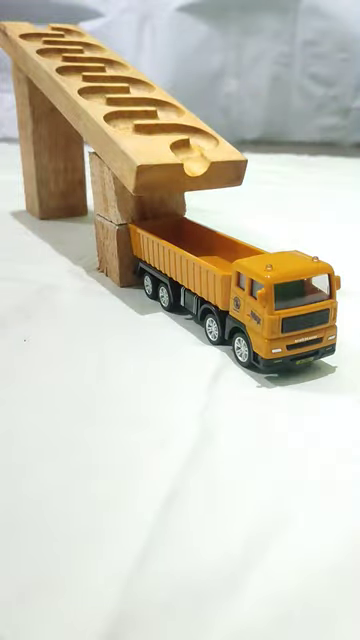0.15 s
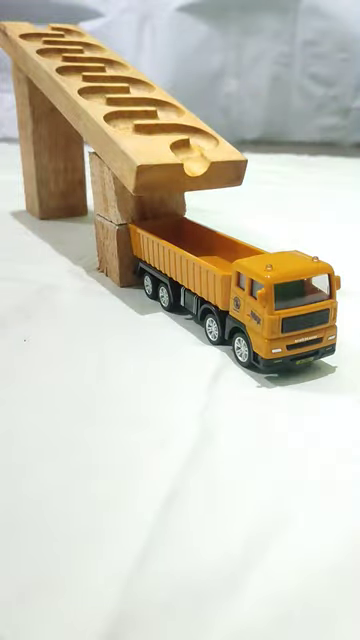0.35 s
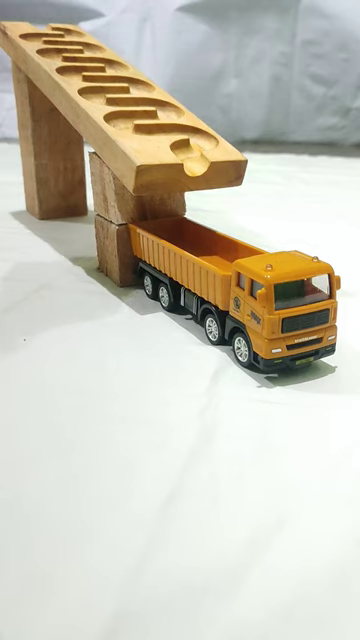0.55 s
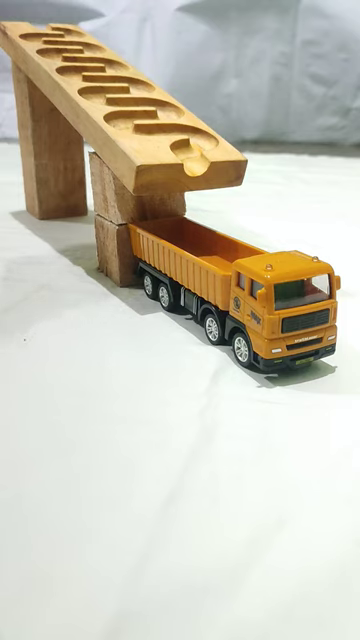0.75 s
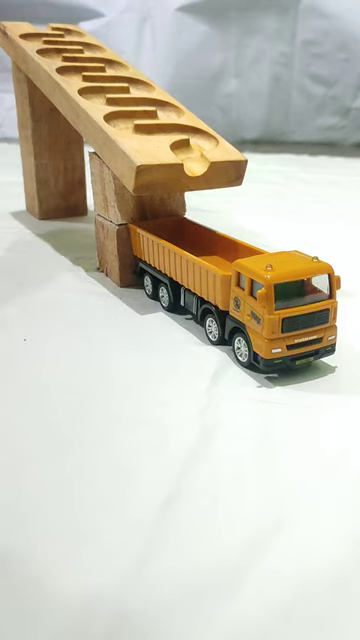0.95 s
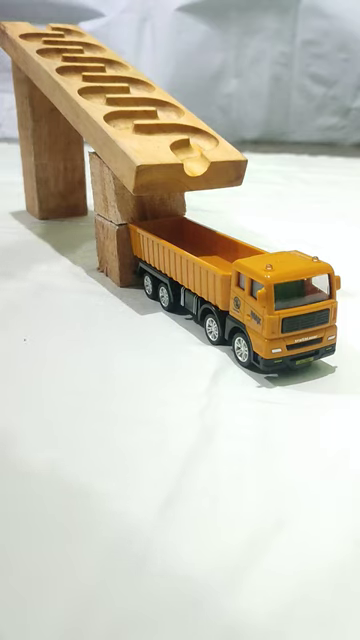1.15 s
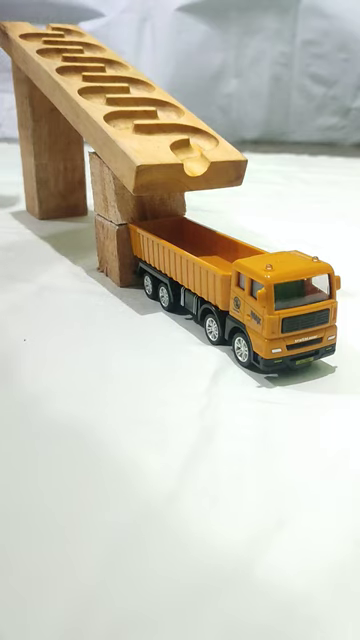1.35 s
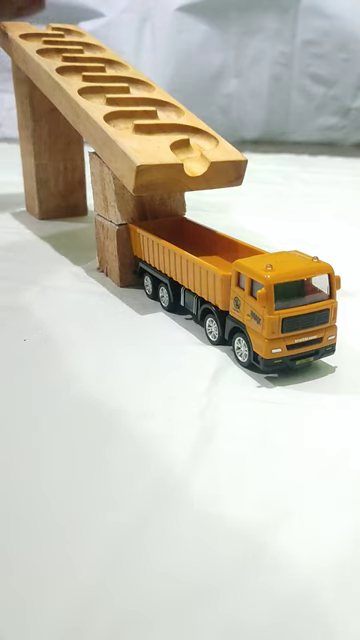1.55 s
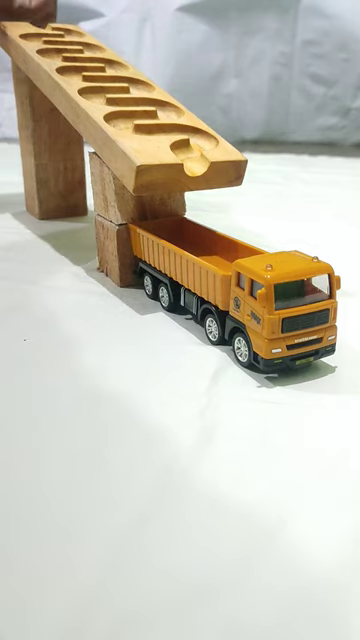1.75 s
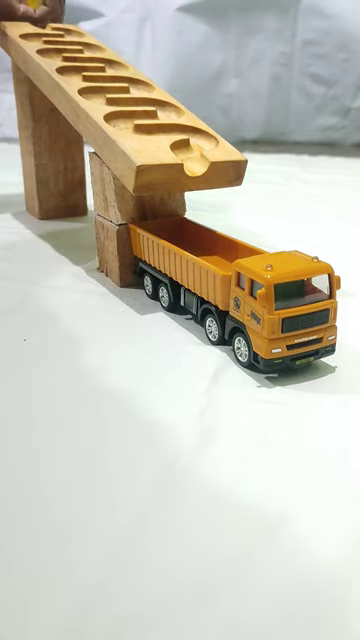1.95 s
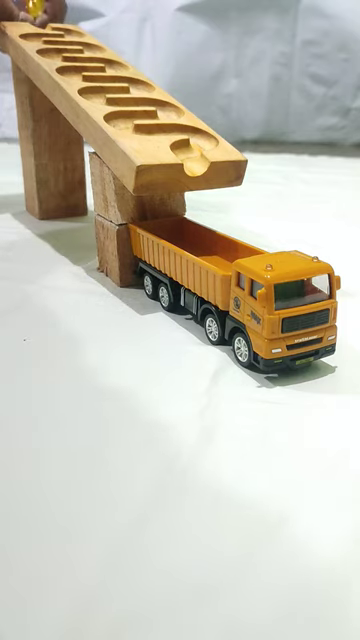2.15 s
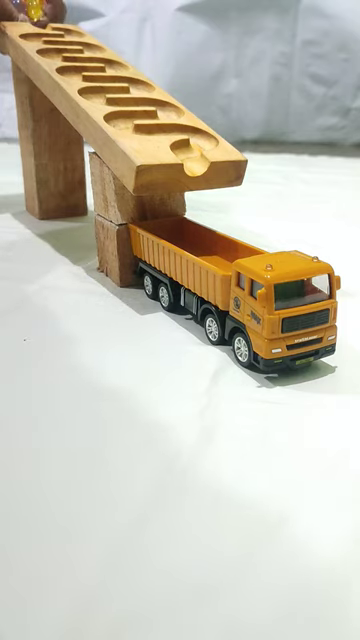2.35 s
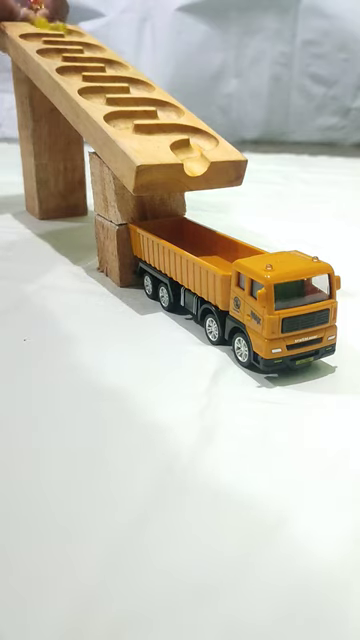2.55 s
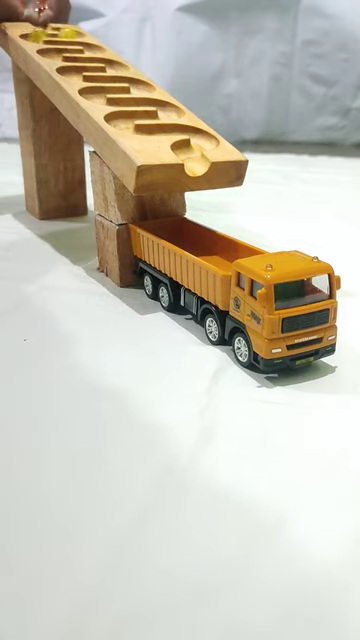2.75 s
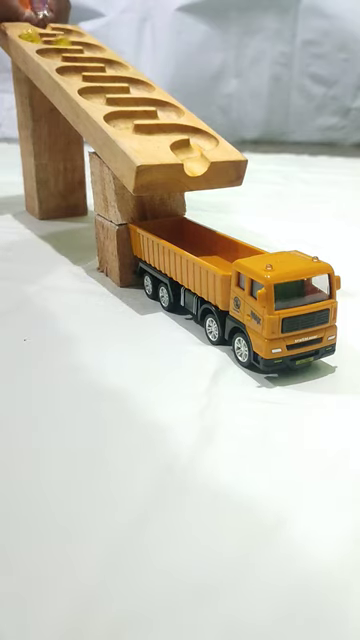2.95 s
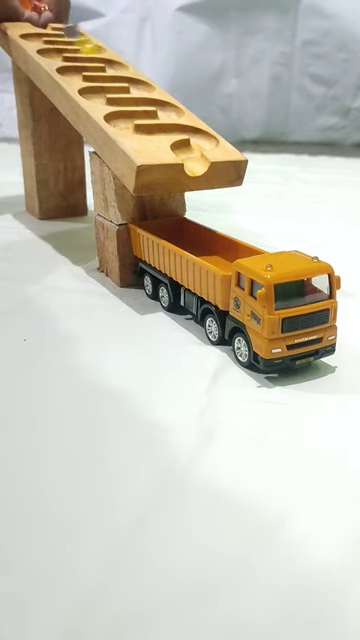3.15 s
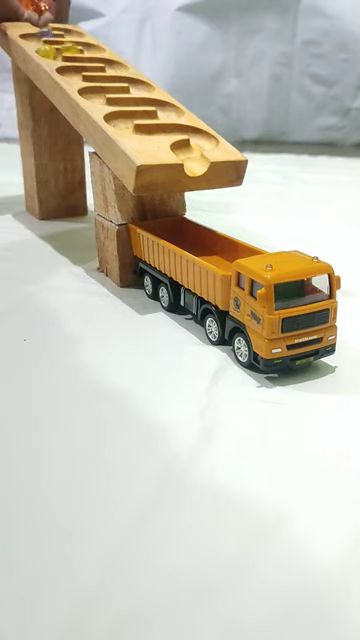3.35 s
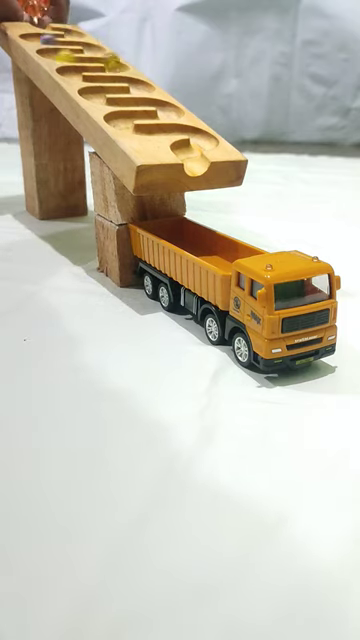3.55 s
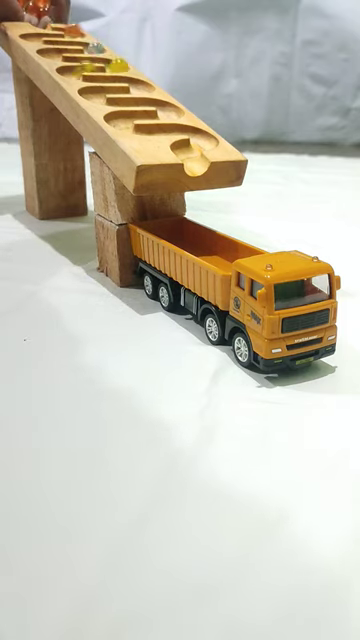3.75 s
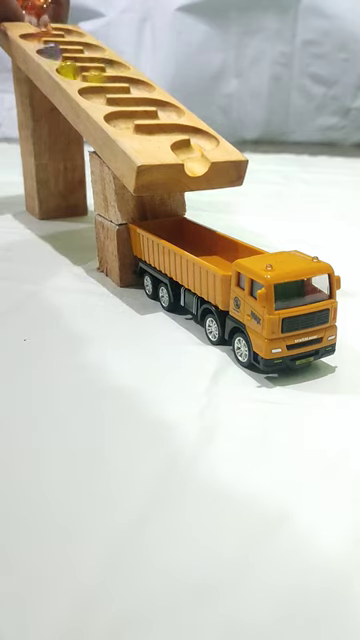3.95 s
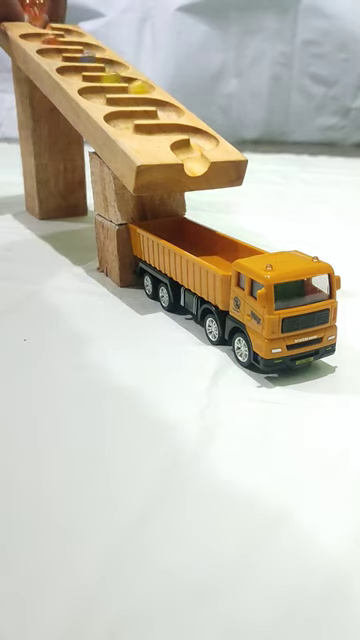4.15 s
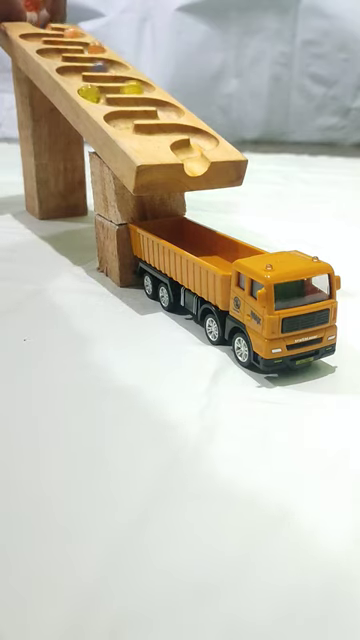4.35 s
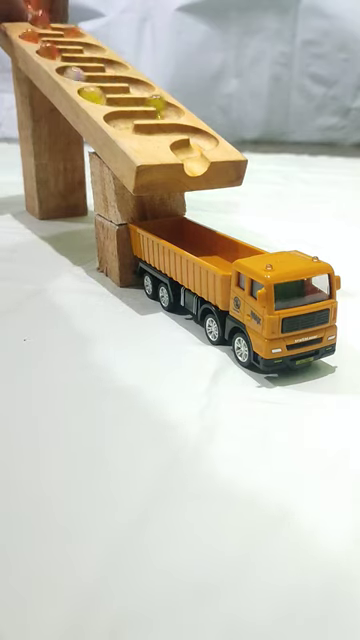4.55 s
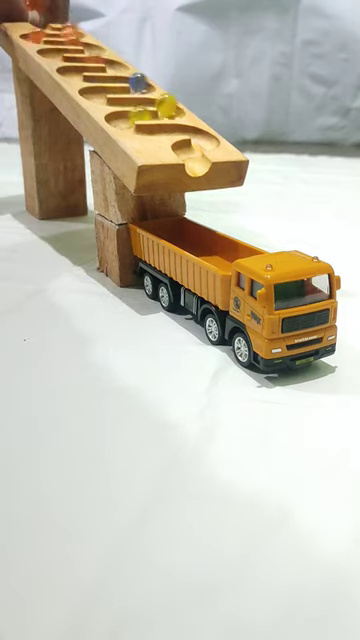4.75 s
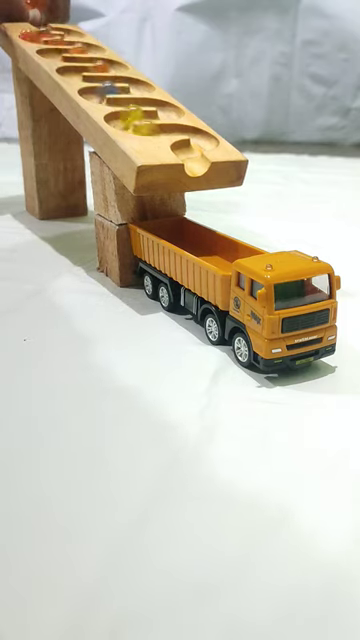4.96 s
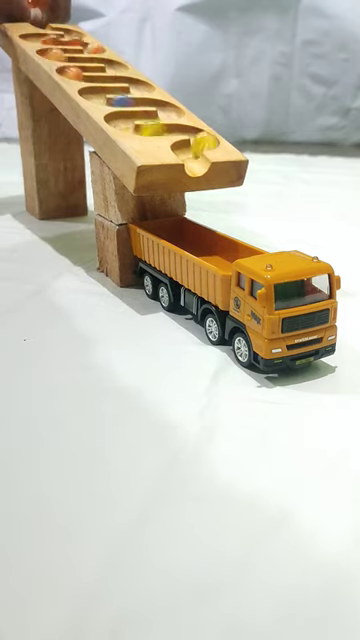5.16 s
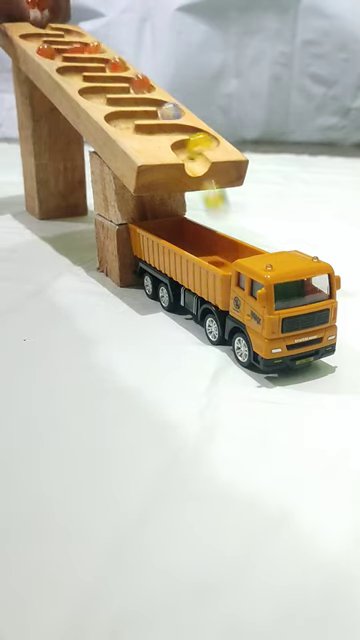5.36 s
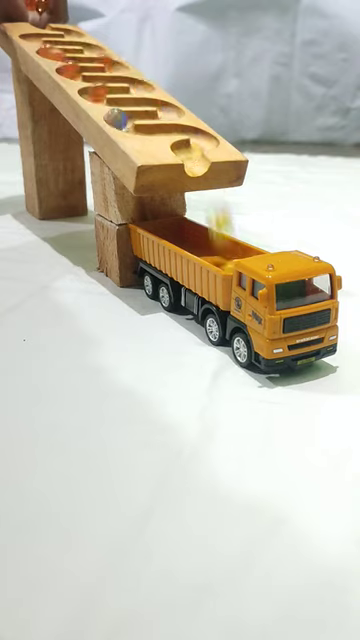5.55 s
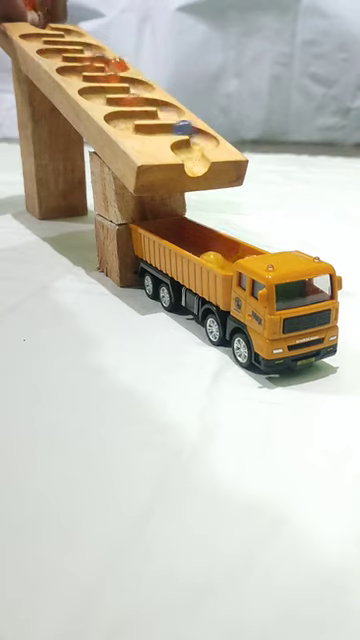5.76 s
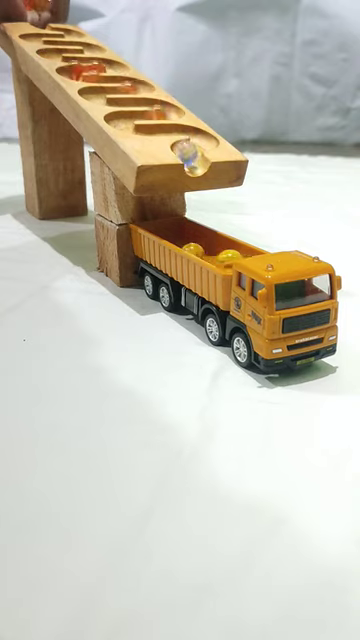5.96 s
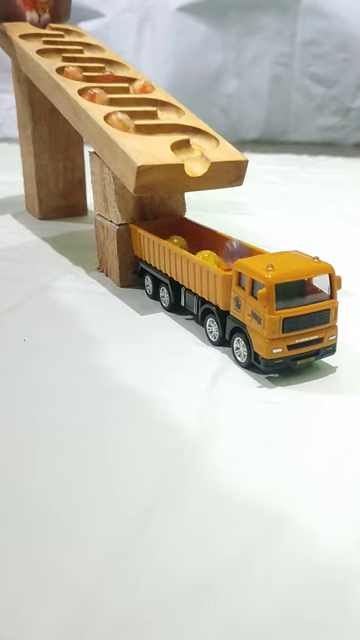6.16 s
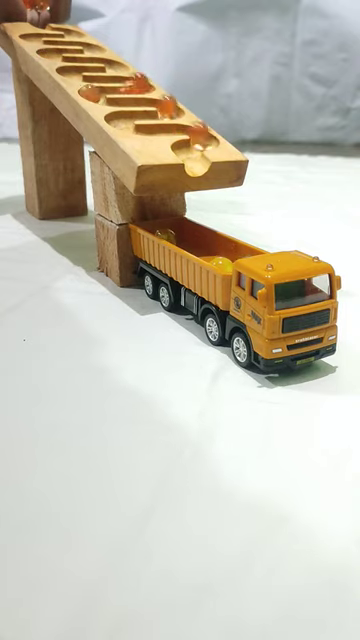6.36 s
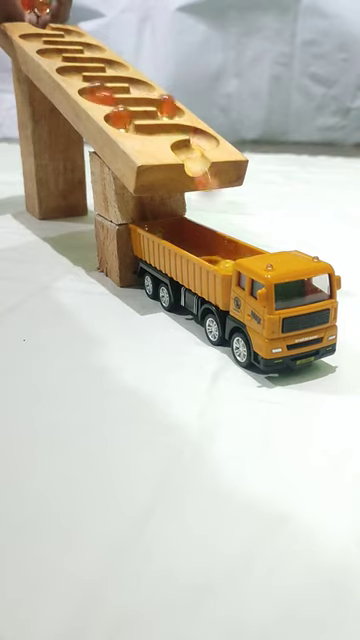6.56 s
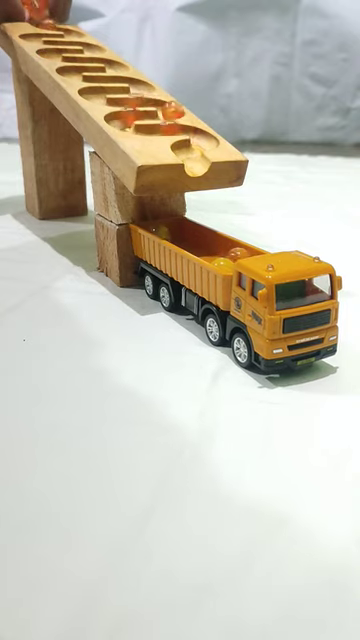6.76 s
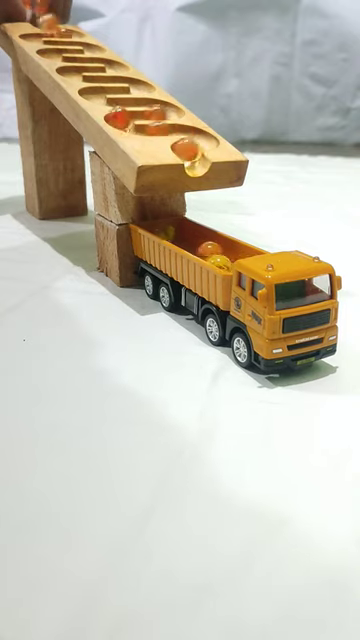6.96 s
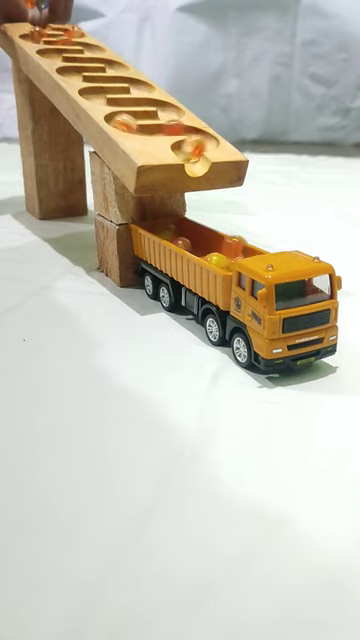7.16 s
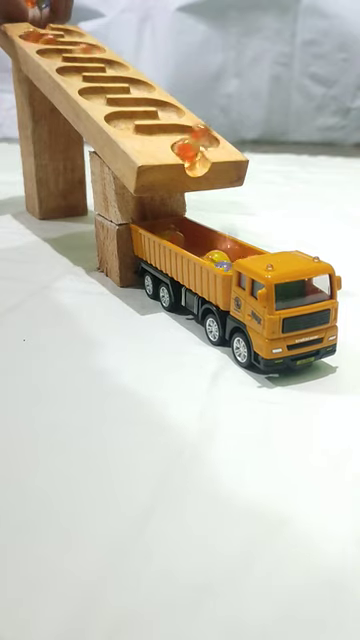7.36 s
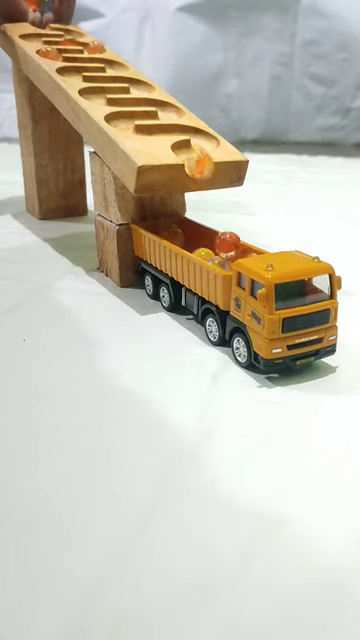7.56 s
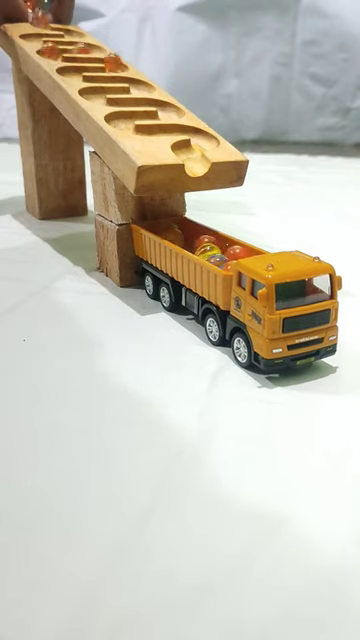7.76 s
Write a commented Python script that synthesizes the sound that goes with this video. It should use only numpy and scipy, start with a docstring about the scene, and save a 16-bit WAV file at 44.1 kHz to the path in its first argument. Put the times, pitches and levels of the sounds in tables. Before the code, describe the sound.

In a quiet hard-walled room, marbles clatter down a zigzag wooden track, then drop one by one with sharp, bouncing plastic cracks.

```python
"""A hand rustles faintly and taps as it gathers glass marbles; then they rumble down a zigzag groove in a wooden slope.
They knock at each bend and clink together; one by one they drop into a plastic truck bed, crack, bounce and rattle.
Struck bodies are sums of decaying modes, hard contacts are short noise bursts, and rolling is a train of tiny blows.
Echoes and a diffuse tail form a hard-walled room, heard by two microphone ports over a faint rumble and hiss."""
import sys
import numpy as np
from scipy import signal
from scipy.fft import rfft, irfft
from scipy.io import wavfile
from scipy.ndimage import uniform_filter1d

SR = 44100
rng = np.random.default_rng(int(sys.argv[2]) if len(sys.argv) > 2 else 0)


def persist_wave(psi):
    """Save psi, clipped to +-1, as 16-bit WAV."""
    counts = np.round(np.clip(psi, -1, 1) * 32767).astype(np.int16)
    wavfile.write(sys.argv[1], SR, np.atleast_2d(counts).T)


N = 344862  # samples

# In all event tables the levels are relative: each source adds its own offset.
# marble against the end of a bend: start_s, level_db, extra_treble_db
KNOCKS = [(2.5418, -31.5, -4), (2.5616, -35, 5), (2.5733, -24.5, -3.5), (2.6557, -21.5, -1),
          (2.6836, -27.5, 17), (2.7354, -28.5, -12), (3.0544, -44.5, -19), (3.1399, -36.5, -1),
          (3.1576, -19.5, 1.5), (3.2414, -31.5, -4), (3.2664, -30.5, 11.5), (3.4564, -37, -13),
          (3.5787, -37, -20), (3.631, -33, -15), (3.6975, -33, -5), (3.7227, -23, 2), (3.8382, -27, 2),
          (3.8864, -32.5, 15.5), (4.1224, -38, -12), (4.2718, -18, -3.5), (4.3739, -29, -5),
          (4.4166, -31, 12), (4.556, -28.5, -14), (4.5814, -30.5, -4), (4.6035, -28.5, 9.5),
          (4.6448, -28, 3), (4.6659, -24.5, 1), (4.6801, -23, -4.5), (4.7257, -28, 1), (4.7691, -26, 0.5),
          (4.8396, -26, -3), (4.9035, -28.5, 9.5), (4.9724, -31.5, 5.5), (5.1391, -36.5, 7.5),
          (5.2963, -54, -16), (5.3506, -33.5, 12), (5.412, -30.5, 7), (5.9163, -36, -7),
          (5.9647, -32.5, 0.5), (6.0402, -33.5, -13), (6.363, -35.5, 6), (6.4634, -32.5, 4.5),
          (6.493, -31, 16), (6.6093, -33, -0.5), (6.8487, -21, 1), (6.9188, -21.5, -4), (7.0075, -27, 9.5),
          (7.1167, -22.5, -1), (7.1385, -17.5, 0.5), (7.2227, -29.5, 10)]
# marble landing in the truck: start_s, level_db, extra_treble_db, thud_db, bounce_flight_times_s
DROPS = [(5.4861, -16, 0.5, -12.5, [0.073, .0541]), (5.6674, -16, 0, -12, [.077, .0475]),
         (6.1799, -24, 11, -19, []), (6.187, -15, 1.5, -7.5, [.0737]), (6.7374, -14.5, 4, -6, [0.075]),
         (7.2465, -14.5, 2, -9, [.0785]), (7.4846, -14.5, 2, -13, [0.076]), (7.644, -14, 2.5, -3, [0.084]),
         (7.7591, -16.5, 3, -26, []), (7.7871, -15.5, 1, -13, [])]
# glass touching glass: start_s, level_db
CLINKS = [(2.0734, -74), (2.1674, -72), (2.433, -49), (2.4946, -52), (2.6927, -51), (2.9092, -51),
          (4.317, -51.5), (4.3869, -51.5), (4.4495, -51), (4.467, -48.5), (4.4904, -46), (4.6573, -52.5),
          (6.0337, -63.5), (6.5228, -46), (6.6297, -52), (6.8063, -38), (7.007, -47.5)]
# loudness curve of rolling along the groove: time_s, level_db
ROLL_CURVE = [(2.53, -79), (2.57, -56), (2.92, -44), (2.99, -48.5), (3.22, -46.5), (3.52, -51), (3.78, -40),
              (4.04, -49), (4.18, -40.5), (4.52, -47), (4.72, -36.5), (5.08, -43), (5.2, -41.5),
              (5.95, -40), (6.15, -48.5), (6.38, -39.5), (7.2, -44.5), (7.82, -44.5)]
# soft taps of the hand: start_s, level_db, low_body_db
TAPS = [(0.391, -50.5, -2), (0.702, -63, -22), (1.554, -53, -9), (1.716, -48.5, -33), (1.813, -55, -27),
        (2.0731, -44.5, -19)]
# strokes of the hand: peak_s, level_db, swell_s, fade_s
STROKES = [(0.572, -54.5, 0.043, 0.027), (0.76, -69, .03, 0.029), (0.862, -63, .035, 0.067),
           (0.97, -59.5, 0.052, 0.084), (1.04, -66.5, 0.13, 0.52), (1.62, -65.5, 0.013, 0.06),
           (1.715, -67.5, 0.14, 0.23), (2.054, -66, .03, 0.054), (2.16, -61, 0.05, 0.056)]

# modes of the wooden slope: pitch_hz, level_db, t60_s
SLOPE_MODES = [(512.4, -29, 0.18), (552, -33.5, 0.057), (634, -26.5, 0.033), (1010, -38, 0.021),
               (1285, -8.5, 0.022), (1415, -3.5, 0.05), (1695, -14, 0.027), (2090, -17.5, 0.027),
               (2287, -6.5, 0.031), (2510, -8, 0.022), (2560, -4.5, 0.027), (2750, -15, 0.039),
               (3250, -16, 0.037), (3552, -18, 0.044), (3890, -15.5, 0.022), (4080, -31, 0.0048),
               (5100, -15.5, 0.009), (5750, -25.5, 0.0042), (7210, -28, 0.014)]
# modes of the plastic truck bed: pitch_hz, level_db, t60_s
BED_MODES = [(1170, -14.5, 0.017), (1235, -7, 0.029), (1371, -6, 0.051), (1638, -1.5, 0.037),
             (1830, -17, 0.0035), (2276, -6.5, 0.04), (2990, -0.5, 0.015), (3130, -13, 0.035),
             (3670, -2.5, 0.022), (3996, 2.5, 0.026), (4240, -7, 0.015), (6000, -20, 0.007),
             (6720, -10, 0.028), (7270, -4.5, 0.03)]

# spectrum of a landing: frequency_hz, density_db
CRACK_SPECTRUM = [(200, -27), (700, -22), (950, -14), (1250, -4), (3000, -0.5), (4000, 5.5), (5000, -2),
                  (6100, -0.5), (8000, -4.5), (9200, -8), (11500, -3), (14000, -7)]
# spectrum of a glass tick: frequency_hz, density_db
GLASS_SPECTRUM = [(700, -39), (2000, -23), (3700, -9), (5200, -6), (7200, 3.5), (9000, 1), (14000, -5)]
# spectrum of the rustle: frequency_hz, density_db
CLOTH_SPECTRUM = [(200, -11), (600, -5.5), (1000, -7.5), (1800, -3), (3500, -3), (5200, -6), (7000, -8),
                  (9000, -15), (14000, -12)]
# spectrum of the still room: frequency_hz, density_db
AIR_SPECTRUM = [(20, 6.5), (60, -2.5), (140, -10), (250, -15.5), (400, -19.5), (1000, -25), (4000, -29),
                (7000, -37), (9000, -37.5), (14000, -32)]
# the board's dense modes, heard as a noise burst: frequency_hz, density_db
DENSE_MODES = [(150, -23), (300, -12.0), (650, -3.5), (900, -9.5), (2000, 0.5), (3000, -5.5),
               (5500, -7.5), (7500, -18.0), (10000, -22.5)]
# colour of the soft rolling contact, which favours the low modes: frequency_hz, gain_db
SOFT_CONTACT = [(230, 8), (400, 7.5), (500, -2.0), (660, 10.5), (950, 5), (1400, 4), (2000, -0.5),
                (2600, -8.0), (4000, -16), (7000, 0.0), (12000, 8)]
# how well the narrow board radiates: frequency_hz, gain_db
BOARD_RADIATION = [(60, -27), (250, -9), (380, -11), (500, 1), (7000, -1), (9000, -5), (14000, -4)]
# how the bed radiates, weak near 500 Hz and strong near 1.1 kHz: frequency_hz, gain_db
BED_RADIATION = [(100, 1.5), (500, -6.5), (1100, 6.5), (2000, -0.5)]

# decay of the room: frequency_hz, t60_s
ROOM_T60 = [(200, 0.77), (600, 0.64), (1500, 0.4), (3000, 0.39), (7000, 0.29), (13000, 0.33)]
# strength of the room's tail after the slope: frequency_hz, gain_db
SLOPE_WET = [(500, -2), (1400, -5), (2500, 3.5), (3800, 5.5), (5200, 4.5), (7000, 4), (12000, 1)]
# strength of the room's tail after the truck: frequency_hz, gain_db
TRUCK_WET = [(500, -8), (1400, -1.5), (2800, 7), (4000, -2.5), (7000, 0.5), (12000, -4)]
# strength of the room's tail after the clinks, then after the hand: frequency_hz, gain_db
CLINK_WET = [(2000, 18.4), (7000, 5.0), (13000, 4.6)]
HAND_WET = [(500, -18.0), (8000, -15.0)]
# near reflections from table and wall: left_delay_s, right_delay_s, relative_level_db
ECHOES = [(.0011, .0016, -4), (.0027, .0021, -7), (.0056, .0063, -10), (0.0104, .0107, -12.5),
          (0.018, .0184, -10)]

# colour of the two microphone ports: frequency_hz, gain_db
PORT_COLOUR = [(5200, -0.5), (6200, 2), (6600, 4), (6850, 6.5), (7150, 4.5), (7500, 1.5), (8200, -0.5),
               (10000, -2.5), (14000, -2.5)]
# balance of sound from the slope: frequency_hz, left_minus_right_db
SLOPE_PAN = [(60, -2.5), (150, 0), (380, 1), (950, -2.5), (2380, 0), (5970, -5.5), (15000, -0.5)]
# balance of sound from the truck: frequency_hz, left_minus_right_db
TRUCK_PAN = [(60, -3), (120, -4.0), (240, 0), (480, -4.5), (950, -5), (1890, -2.5), (3770, -1.5),
             (7510, -5.5), (15000, -3)]

PORT_LAG_S = 0.0003635  # a blow reaches the right port later by this
TAIL_LAG_S = 0.00031  # span that sets how alike the room's diffuse tail is at the two ports: alike for long waves, less so for short
EDGE_HZ = 14250  # upper limit of the band
# light ticks between the bends: level over the rolling, and spread of level and treble
TICK_OVER_DB, TICK_SPREAD_DB, TICK_TREBLE_DB = 6, 4, 2.5
LANDING_BODY_DB = -1.5  # a full landing rings the bed more than a bounce
# a bounce is weaker, thinner and duller than its landing; each further one loses a little more
BOUNCE_DB, BOUNCE_BODY_DB, BOUNCE_TREBLE_DB, NEXT_BOUNCE_DB = -9.5, -4.5, -1.5, -1.5
STROKE_DEPTH_DB = 16.5  # rise over one swell time, fall over one fade time
# body near 1.4 kHz gains this much per dB below a firm knock, up to a limit; above firm it loses
FIRM_DB, BODY_PER_DB, BODY_MOST_DB = -28, 0.37, 11.5


def knocks(rows, level_db=-0.99, tick_db=-32, thock_db=-16):
    """Modal excitation: a marble's impact rings the board; lighter is rounder, harder contact is brighter."""
    out = np.zeros((2, N))
    for start_s, db, treble_db in rows:
        body_db = min(BODY_PER_DB * (FIRM_DB - db), BODY_MOST_DB)
        tilt = [(500, 1.06 * body_db), (1450, body_db), (2200, 0.005), (2800, 0),
                (3800, 0.75 * treble_db), (5500, treble_db), (9000, 0.7 * treble_db)]
        wood = blow(ring(SLOPE_MODES, spread_db=1.5, detune=0.0067, aim_db=1), 0)
        wood = wood + blow(burst(DENSE_MODES, seconds=0.0079), thock_db)
        glass = blow(burst(GLASS_SPECTRUM, seconds=0.0023), tick_db)
        add(out, start_s, blow(colour(wood + glass, tilt), db + level_db))
    return colour(out, BOARD_RADIATION)


def ticks(count=70):
    """Random light impacts: marbles brush the groove wall as hard as they roll; rows like the knocks."""
    when, strength, treble = rng.random((count, 3)).T
    first_s = ROLL_CURVE[0][0]
    start_s = first_s + when * (N / SR - first_s)
    rolling_db = np.interp(start_s, *np.transpose(ROLL_CURVE))
    db = rolling_db + TICK_OVER_DB + TICK_SPREAD_DB * (2 * strength - 1)
    return list(zip(start_s, db, TICK_TREBLE_DB * (2 * treble - 1)))


def rolling(level_db=-5.0, bumps_per_s=420, bump_db=3, lurch_db=4.5, count=7, size=700):
    """Random impulse excitation: wood grain jolts the marbles, in lurches at several places on the board."""
    out = np.zeros((2, N))
    for _ in range(count):
        bumps = (rng.random(N) < bumps_per_s / count / SR) * rng.choice([-1, 1], N)
        lurch = np.clip(unit(uniform_filter1d(rng.standard_normal(N), size)), -2, 1)
        bump_strength = np.minimum(rng.exponential(1, N), 2)
        bumps = bumps * amp(bump_db * bump_strength + lurch_db * lurch)
        board = ring(SLOPE_MODES, spread_db=5, detune=0.003, aim_db=1)
        out += signal.oaconvolve(bumps[None], board, axes=1)[:, :N]
    rumble = colour(colour(out, SOFT_CONTACT), BOARD_RADIATION)
    return unit(rumble) * follow(ROLL_CURVE) * amp(level_db)


def drops(level_db=.5, bed_db=-3, jostle_db=-25, jostle_s=.035, settle_db_per_s=70, count=3):
    """Impact on a thin shell: glass cracks on the heap, the plastic bed rings, and loose marbles settle."""
    out = np.zeros((2, N))
    for start_s, db, body_db, treble_db in landings():
        crack = blow(burst(CRACK_SPECTRUM, seconds=0.0011, rise=0.001), 0)
        bed = blow(ring(BED_MODES, spread_db=2.5, detune=0.013, aim_db=4.0), bed_db)
        tilt = [(1800, body_db), (2800, 0.0074), (4500, 0.0067), (6500, treble_db)]
        add(out, start_s, blow(colour(crack + bed, tilt), db + level_db))
        for late, strength in rng.random((count, 2)):
            late_s = 0.0028 + late * jostle_s
            clack = blow(burst(CRACK_SPECTRUM, seconds=0.001), 0)
            clack = clack + blow(ring(BED_MODES, spread_db=5.0, detune=0.012, aim_db=9), -20)
            # half the landing's dB: even a light bounce stirs the loose heap
            clack_db = .5 * db + jostle_db - settle_db_per_s * late_s + 6 * (strength - .5)
            add(out, start_s + late_s, blow(clack, clack_db))
    return colour(out, BED_RADIATION)


def landings():
    """Rebound with energy loss: yields each landing and its bounces as start_s, level_db, body_db, treble_db."""
    for start_s, db, treble_db, _, flights_s in DROPS:
        yield start_s, db, LANDING_BODY_DB, treble_db
        for k, late_s in enumerate(np.cumsum(flights_s)):
            bounce_db = db + BOUNCE_DB + k * NEXT_BOUNCE_DB
            yield start_s + late_s, bounce_db, BOUNCE_BODY_DB, treble_db + BOUNCE_TREBLE_DB


def thuds(level_db=-26, seconds=0.06, rise=0.00065, left_db=-14, table_hz=150, table_db=-8, table_s=0.0025):
    """Momentum transfer: a landing gives a low pressure push and a damped thump of the table."""
    out, t = np.zeros((2, N)), port_times(size=12000)
    push = (1 - t / seconds) * np.exp(-t / seconds) * (1 - np.exp(-t / rise)) * amp([[left_db], [0]])
    thump = amp(table_db) * np.exp(-t / table_s) * np.sin(2 * np.pi * table_hz * t)
    for start_s, _, _, thud_db, _ in DROPS:
        add(out, start_s + rise, (push + thump) * amp(thud_db + level_db))
    return out


def clinks(level_db=4.5):
    """Short contact of stiff bodies: marbles ring above hearing, so glass on glass is only a bright tick."""
    out = np.zeros((2, N))
    for start_s, db in CLINKS:
        add(out, start_s, blow(burst(GLASS_SPECTRUM, seconds=0.00049), db + level_db))
    return out


def hand(rustle_db=1.0, grain_db=3.5, tap_db=-7.0, body_offset_db=14, size=90):
    """Friction noise: strokes modulate a grainy rustle, with soft taps, as the marbles are gathered."""
    grain = unit(uniform_filter1d(rng.standard_normal(N), size))
    rustle = colour(rng.standard_normal((2, N)) * amp(grain_db * grain), CLOTH_SPECTRUM)
    out = unit(rustle) * strokes() * amp(rustle_db)
    for start_s, db, body_db in TAPS:
        tilt = [(400, body_db + body_offset_db), (2000, -4.0), (9000, -10)]
        tap = colour(burst(CLOTH_SPECTRUM, seconds=0.0028, rise=0.00092), tilt)
        add(out, start_s, blow(tap, db + tap_db))
    return out


def strokes():
    """Exponential envelopes: gain at every sample as each stroke of the hand swells and fades."""
    t = np.arange(N) / SR
    gain = 0
    for peak_s, db, swell_s, fade_s in STROKES:
        distance = np.maximum((peak_s - t) / swell_s, (t - peak_s) / fade_s)
        gain = gain + amp(db - STROKE_DEPTH_DB * distance)
    return gain


def air(level_db=-60.5, shared=0.7, right_db=3.0):
    """Partial coherence: low room rumble is partly common to both ports, under a faint hiss."""
    own = colour(rng.standard_normal((2, N)), AIR_SPECTRUM)
    common = colour(colour(rng.standard_normal((1, N)), AIR_SPECTRUM), [(300, 0.0), (900, -22)])
    return amp(level_db) * unit((own + shared * common) * amp([[0], [right_db]]))


def room(x, wet, build, echo_db, size=26000, step_count=12):
    """Reverberation: direct sound, a few near reflections, and a diffuse tail decaying by frequency."""
    taps = np.zeros((2, size))
    at = np.arange(0, size - step_count, step_count)
    at = at + rng.integers(0, step_count, (2, len(at)))
    np.put_along_axis(taps, at, rng.choice([-1., 1.], at.shape), 1)
    hz, t, z = signal.stft(taps, SR, nperseg=256)
    alike = np.sinc(2 * hz * TAIL_LAG_S)[:, None]  # long waves reach both ports as one
    z[1] = alike * z[0] + np.sqrt(1 - alike ** 2) * z[1]
    decay = amp(-60 * t / read(ROOM_T60, hz)[:, None])
    tail = signal.istft(z * decay, SR)[1][:, :size]
    tail *= 1 - np.exp(-(np.arange(size) / SR / build) ** 2)  # gradual build-up
    answer = colour(unit(tail) / np.sqrt(size), wet)
    answer[:, 0] += 1  # direct sound
    for left_s, right_s, db in ECHOES:
        answer[[0, 1], [round(left_s * SR), round(right_s * SR)]] += amp(db + echo_db)
    return signal.oaconvolve(x, answer, axes=1)[:, :N]


def pan(x, points):
    """Level difference between ports: tilts each frequency towards the left or the right port."""
    half_db = read(points, np.fft.rfftfreq(2 * N, 1 / SR)) / 2
    return irfft(rfft(x, 2 * N) * amp([half_db, -half_db]))[:, :N]


def ring(modes, spread_db, detune, aim_db):
    """Modal superposition: the place struck weights the modes; each radiates unevenly to the two ports."""
    hz, db, t60 = np.transpose(modes)[:, :, None, None]
    place, shift, aim = np.sqrt(3) * rng.uniform(-1.01, 1, (3, len(modes), 1, 1))
    t = port_times()
    db = db + spread_db * place + aim_db * aim * np.array([[1], [-1]])
    sign = rng.choice([-1, 1], hz.shape)
    wave = np.sin(2 * np.pi * hz * (1 + detune * shift) * t)
    return (sign * amp(db - 60 * t / t60) * wave).sum(0)


def burst(spectrum, seconds, rise=.0001):
    """Contact noise: the brief chatter of an impact, as coloured noise with a fast rise and decay."""
    t = port_times()
    envelope = (1 - np.exp(-t / rise)) * np.exp(-t / seconds)
    return colour(rng.standard_normal(t.shape) * envelope, spectrum)


def port_times(size=6000):
    """Propagation delay: time since a blow arrived, at the left and the right port."""
    return np.maximum(np.arange(size) / SR - np.array([[0], [PORT_LAG_S]]), 0)


def blow(x, db):
    """Onset level: sets the rms of the first 6 ms of a hit."""
    return x * amp(db) / np.sqrt(np.mean(x[:, :265] ** 2) + 1e-20)


def colour(x, points, size=4096):
    """Minimum-phase filtering: a causal filter with the given spectrum."""
    log_gain = np.log(amp(read(points, abs(np.fft.fftfreq(size, 1 / SR)))))
    taps = np.fft.ifft(np.exp(np.conj(signal.hilbert(log_gain)))).real[:size // 2]
    return signal.fftconvolve(x, taps[None], axes=1)[:, :x.shape[1]]


def read(points, hz):
    """Interpolation: reads a table on a log-frequency axis."""
    f, value = np.transpose(points)
    return np.interp(np.log(hz + 1), np.log(f + 1), value)


def follow(curve):
    """Envelope: gain from rows of time_s, level_db; -120 dB outside, but held if they reach the end."""
    s, db = np.transpose(curve)
    after_db = db[-1] if s[-1] > N / SR - .1 else -120
    return amp(np.interp(np.arange(N) / SR, s, db, left=-120, right=after_db))


def add(mix, start_s, sound):
    """Superposition: adds a sound to the mix at its start."""
    part = mix[:, max(round(start_s * SR), 0):][:, :sound.shape[1]]
    part += sound[:, :part.shape[1]]


def amp(db):
    """Decibel law: amplitude ratio of a level."""
    return 10 ** (np.asarray(db) / 20)


def unit(x):
    """Normalisation: scales to rms 1."""
    return x / np.sqrt(np.mean(x ** 2) + 1e-20)


def scene(count=4):
    """Separate paths: each bend has its own path through the room; the truck stands to the right."""
    slope = room(rolling(), SLOPE_WET, build=0.0056, echo_db=-23)
    blows = list(KNOCKS) + ticks()
    for bend in range(count):  # successive knocks come from different bends
        slope += room(knocks(blows[bend::count]), SLOPE_WET, build=0.0022, echo_db=-8.5)
    truck = room(drops(), TRUCK_WET, build=0.0018, echo_db=-1)
    glass = room(clinks(), CLINK_WET, build=0.0045, echo_db=-6.5)
    rustle = room(hand(), HAND_WET, build=0.0029, echo_db=-23)
    return pan(slope + glass + rustle, SLOPE_PAN) + pan(truck, TRUCK_PAN) + thuds() + air()


def record(dry, ceiling=0.77):
    """Resonance and saturation: the ports ring near 7 kHz and round off peaks; then the band limit."""
    rounded = ceiling * np.tanh(colour(dry, PORT_COLOUR) / ceiling)
    edge = signal.firwin(301, EDGE_HZ, window=("kaiser", 8), fs=SR)
    return signal.oaconvolve(rounded, edge[None], "same", axes=1)


dry = scene()
out = record(dry)
persist_wave(out)
```